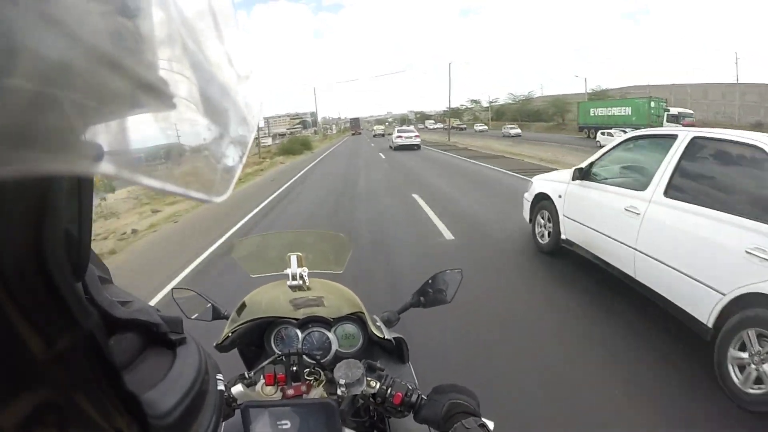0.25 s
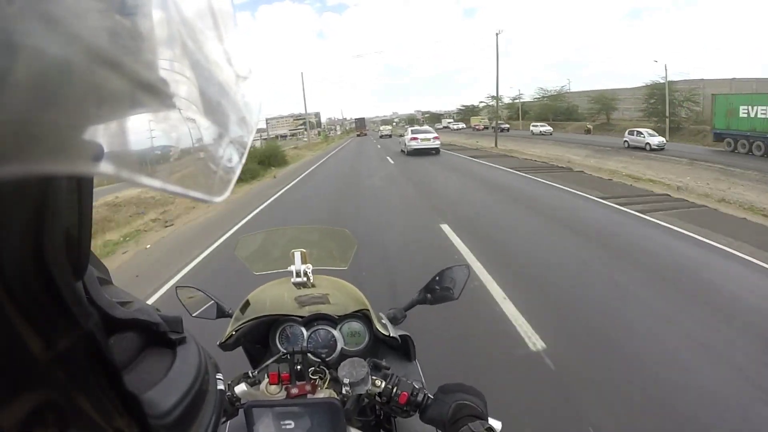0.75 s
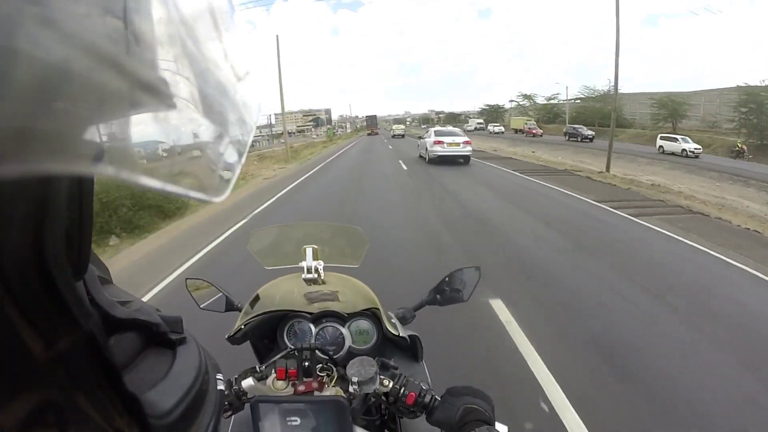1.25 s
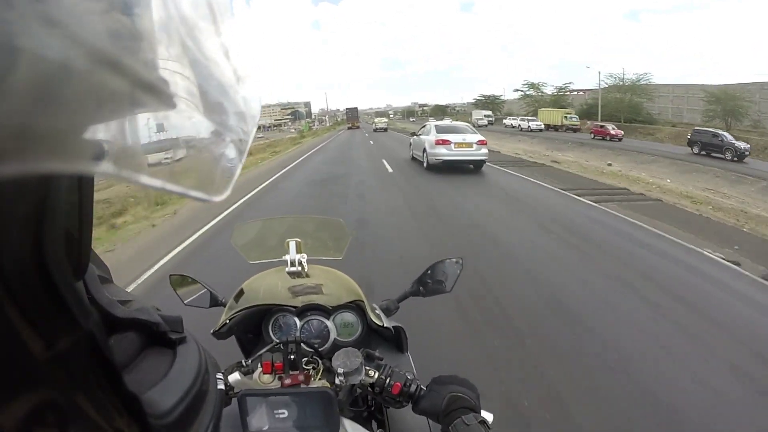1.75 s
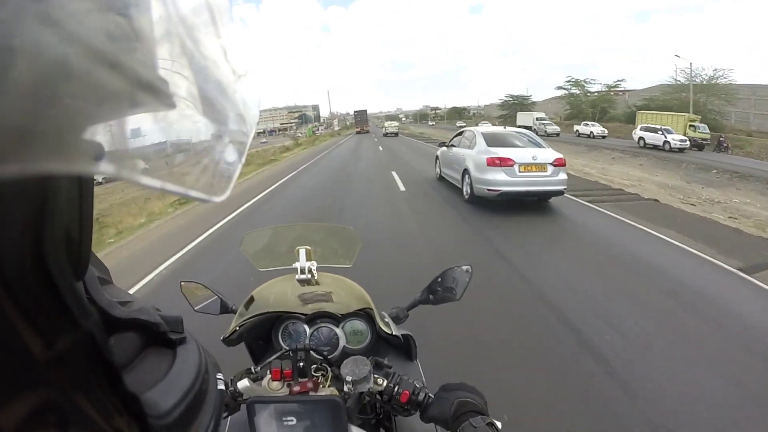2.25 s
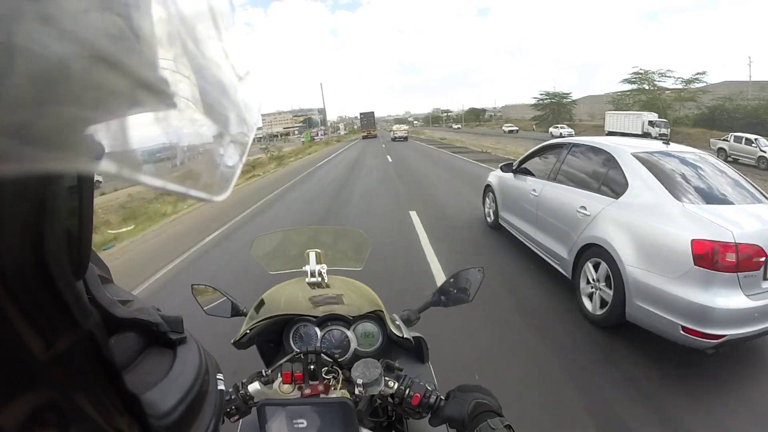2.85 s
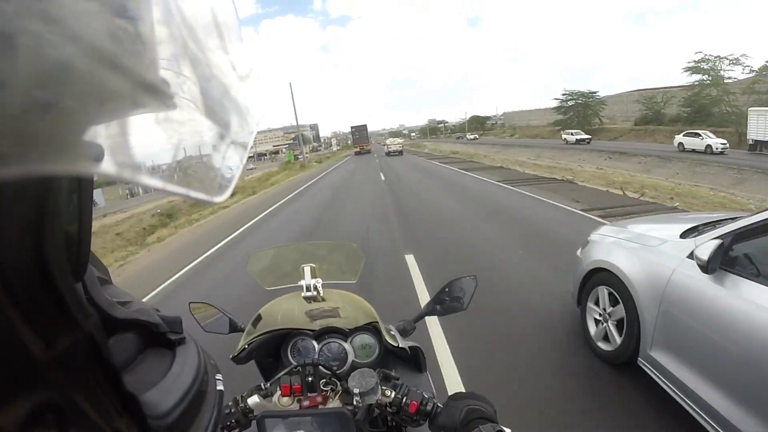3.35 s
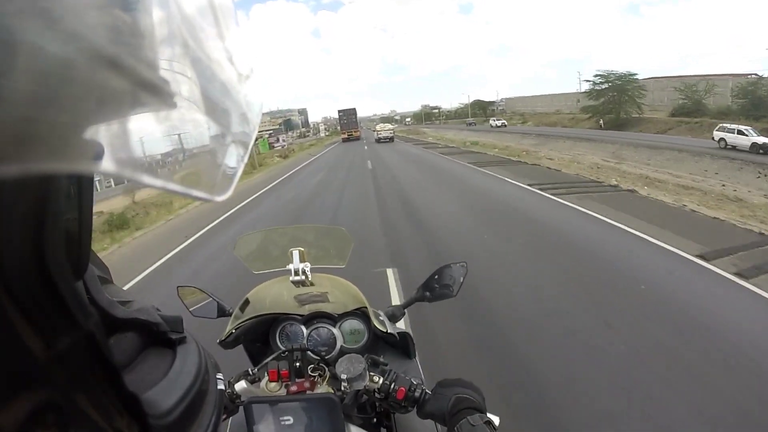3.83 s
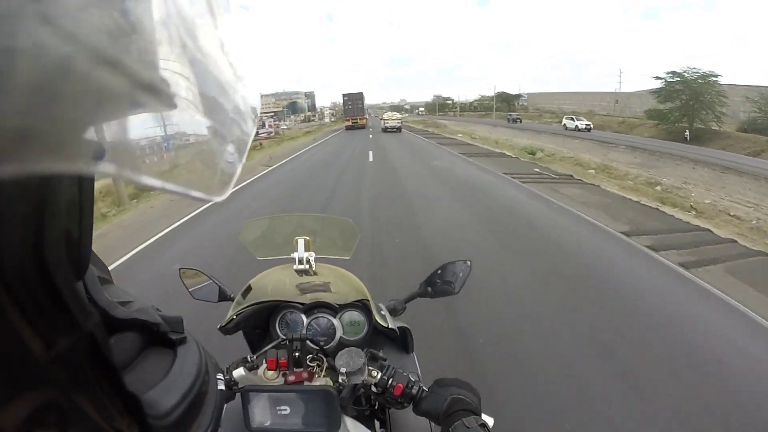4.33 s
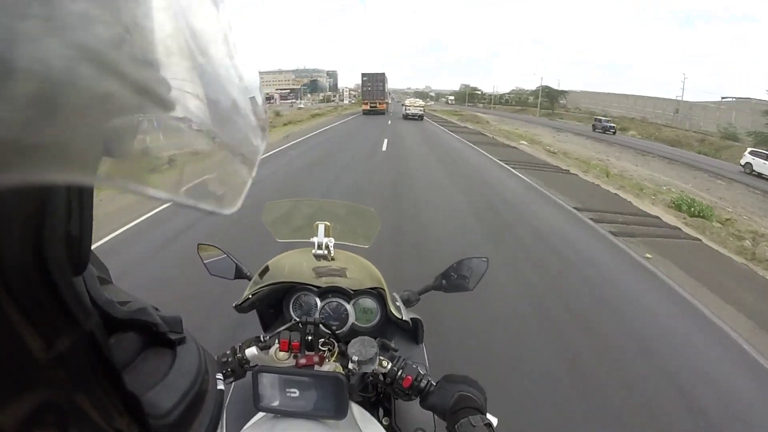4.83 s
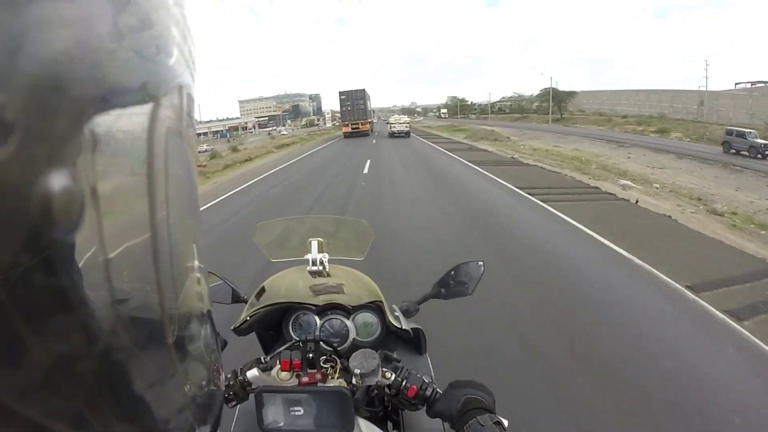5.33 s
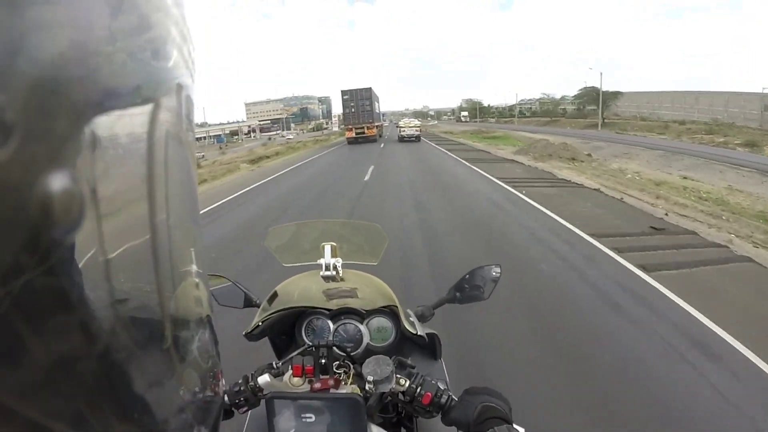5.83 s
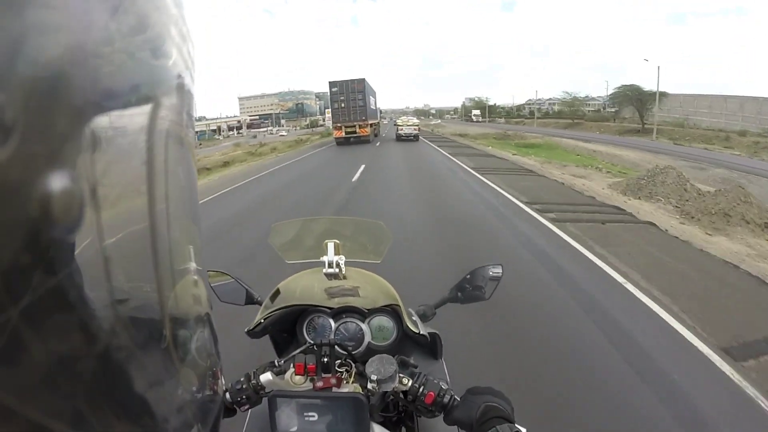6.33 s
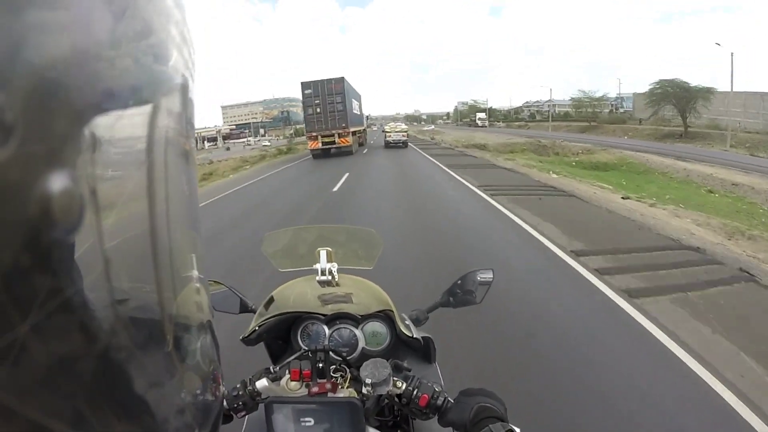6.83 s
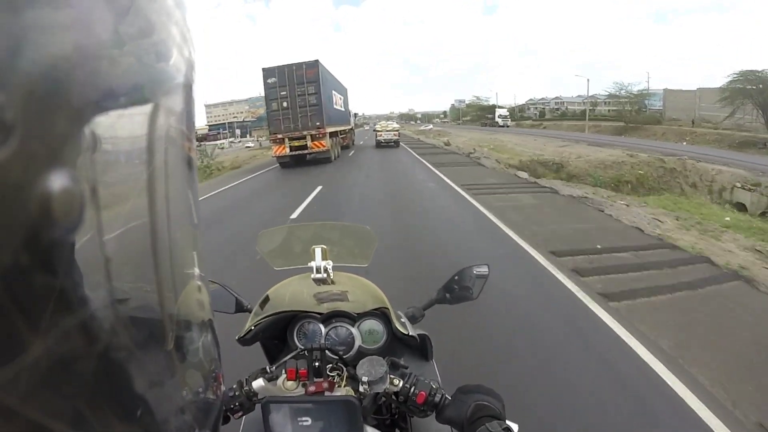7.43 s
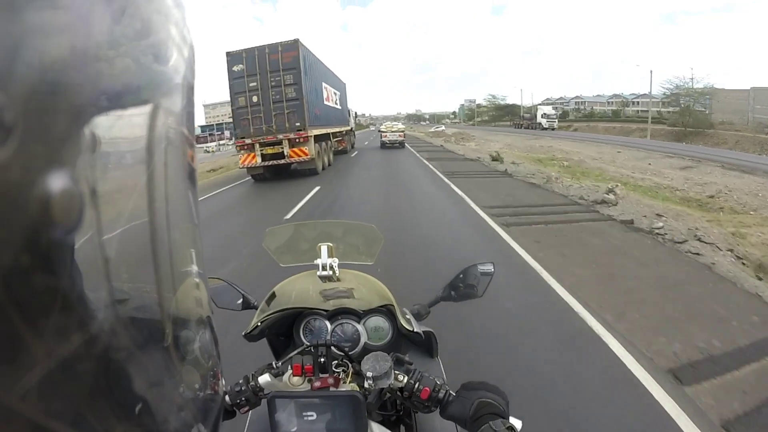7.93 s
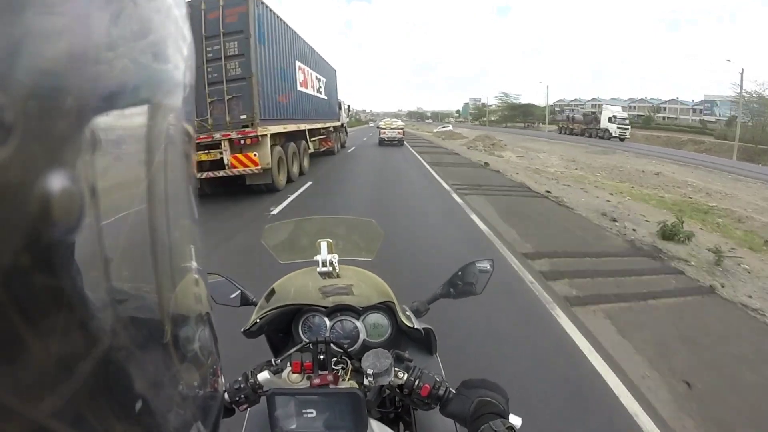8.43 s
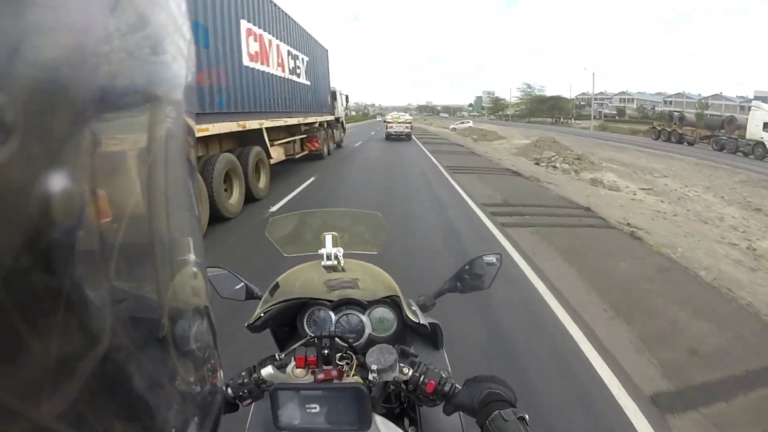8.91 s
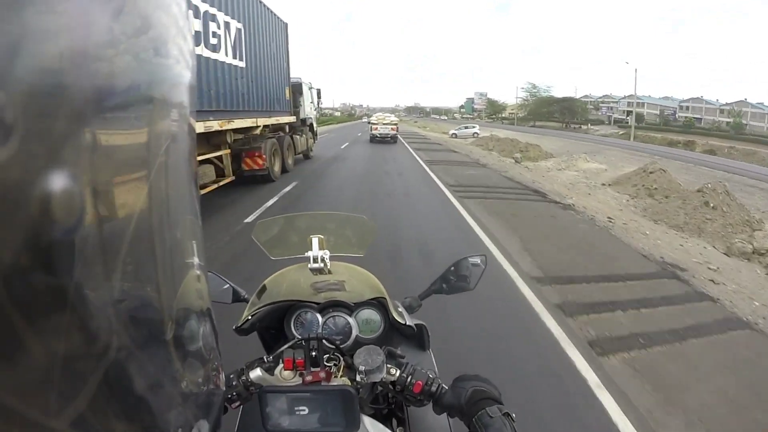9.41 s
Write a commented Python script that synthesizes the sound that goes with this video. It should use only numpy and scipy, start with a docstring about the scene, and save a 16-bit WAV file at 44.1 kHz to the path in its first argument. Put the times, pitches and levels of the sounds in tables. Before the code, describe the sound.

Dense wind noise batters a small cased microphone on a motorcycle helmet at highway speed: low buffeting, a hollow rush and resonant hiss, with irregular thumps and brief lulls. About halfway a visor snaps shut in a rapid cluster of hard plastic knocks; the wind drops suddenly, then gradually climbs back. Towards the end, while passing a lorry, a low engine drone rises out of the slightly easing wind.

```python
"""Wind on a motorcycle helmet at highway speed, heard by a small camera in a case on it.
The air is shaped noise: hiss rung by the case, low buffeting and a rush between, all stirred together.
The rider snaps the visor shut: sine thuds with cracks of noise; the wind's level dips there and climbs back.
An engine drone, a stack of wavering sines, rises out of the wind while a lorry is overtaken.
A faint sine comes and goes early on."""
import sys
import numpy as np
from scipy import signal
from scipy.fft import rfft, irfft, next_fast_len
from scipy.io import wavfile
from scipy.ndimage import uniform_filter1d

SR = 44100
rng = np.random.default_rng(int(sys.argv[2]) if len(sys.argv) > 2 else 0)


def store_pcm(level_fs):
    """Save levels as 16-bit WAV."""
    pcm = np.round(np.clip(level_fs, -1, 1) * 32767).astype(np.int16)
    wavfile.write(sys.argv[1], SR, np.atleast_2d(pcm).T)


N = 426442   # length in samples


def wind():
    """Moving air makes noise; the same eddies shake hiss, buffeting and rush together."""
    # resonances of case and mount, rung by the air: pitch_hz, width_hz, level_db (relative)
    case_modes = [(1182, 94, -14.5), (1433, 74, -21.5), (1700, 83, -11.5), (1845, 58, -14),
                  (2096, 160, -22.5), (2381, 64, -14), (2544, 174, -23), (2970, 71, -24.5),
                  (3276, 138, -20.5), (3750, 130, -20.5), (4172, 133, -14.5), (4475, 300, -18),
                  (4883, 148, -17), (5120, 130, -27), (5890, 440, -35), (7170, 850, -34.5),
                  (7350, 420, -29.5), (7940, 250, -34.5)]
    # the helmet's boom: pitch_hz, width_hz, level_db (relative)
    helmet_modes = [(103.5, 21.2, -0.5)]
    # air pockets under the visor and mount: pitch_hz, width_hz, level_db (relative)
    pocket_modes = [(255.3, 37, 0), (779.3, 17, -5.5)]
    # smooth spectrum of each layer: pitch_hz, level_db (relative, per Hz)
    hiss_spectrum = [(500, -32.5), (1000, -28.5), (2800, -38), (5000, -33), (5500, -36.5), (8300, -56),
                     (10000, -34.5)]
    buffet_spectrum = [(8, -28), (15, -12.5), (30, -6), (60, -6), (90, -3), (130, -15.5), (160, -24),
                       (200, -21), (300, -51)]
    rush_spectrum = [(100, -38.5), (160, -11.5), (200, -8), (300, -10.5), (350, -12), (550, -15),
                     (750, -17.5), (1000, -17.5), (1300, -59)]
    split_hz = 2900   # the hiss flutters partly apart below and above this

    hiss_db, buffet_db, rush_db = wind_levels()
    eddy = drift(54.0)

    below = signal.butter(2, split_hz, fs=SR, output="sos")
    above = signal.butter(2, split_hz, "high", fs=SR, output="sos")
    mids = signal.sosfilt(below, turbulence(eddy, shared_db=1.22, own_db=0.26, rate_hz=24.0))
    treble = signal.sosfilt(above, turbulence(eddy, shared_db=2.0, own_db=-0.6, rate_hz=62.0))
    # when the hiss is low, treble drops more than mids
    mids_gain = from_db(-0.15 * (hiss_db - hiss_db.mean()))
    hiss = coloured(mids_gain * mids + treble, hiss_spectrum, case_modes)

    buffet_noise = turbulence(eddy, shared_db=2.0, own_db=-1.06, rate_hz=14.0)
    buffet = evened(coloured(buffet_noise, buffet_spectrum, helmet_modes), window_s=0.14)

    rush_noise = turbulence(eddy, shared_db=1.0, own_db=0.0, rate_hz=11.0)
    rush = evened(coloured(rush_noise, rush_spectrum, pocket_modes), window_s=0.16)

    return from_db(hiss_db) * hiss + from_db(buffet_db) * buffet + from_db(rush_db) * rush


def wind_levels():
    """Levels of hiss, buffeting and rush in dB: airstream, dip, lulls, surges, thumps and gusts."""
    # airstream on the helmet, easing beside the lorry: time_s, hiss_db, buffeting_db, rush_db
    airstream = [(0, -18.5, -17, -28.5), (1.5, -19.5, -18.5, -29.5), (1.95, -18.5, -20.5, -30),
                 (2.4, -20, -18, -28), (3.0, -19.5, -19, -31), (3.5, -18, -18, -27), (4.3, -21.5, -19, -29),
                 (4.9, -18.5, -19.5, -30.5), (5.5, -18.5, -18, -27.5), (6.6, -18.5, -18.5, -29),
                 (7.3, -16.5, -18.5, -27.5), (7.7, -19, -20.5, -28), (8.3, -20, -22, -29),
                 (8.8, -20.5, -21, -28.5), (9.3, -22.5, -24.5, -30), (9.67, -24, -22.5, -29.5)]
    # lulls of the air: middle_s, half_length_s, hiss_change_db, low_wind_change_db
    lulls = [(0.68,0.057,0.5,-3.5), (1.427,0.023,-5.5,1.5), (1.69,0.015,-2.5,0.5), (1.87,0.039,-2,-4),
             (2.285,0.058,-4.5,2), (2.624,0.053,-5,-2), (3.098,0.024,-6,-2), (3.395,0.0084,-4,0),
             (3.85,.02,-2.5,2.5), (4.305,0.04,-6,-0.5), (4.545,0.014,-7.5,-3.0), (4.61,0.015,-9,-1),
             (5.022,0.0095,-4,0), (5.04,0.0071,-9,0), (5.056,.015,-7,0), (5.085,0.038,-9,3.5),
             (5.17,0.026,-5,-3), (5.65,.025,-2,-2), (5.81,.03,-2,-2.5), (6.031,0.027,-7.5,-3.5),
             (6.081,0.031,-16.5,-5.0), (6.124,0.008,-7,0.5), (6.19,.01,-2.5,0), (6.425,0.024,-13,-1),
             (7.124,0.029,-9,0), (7.568,0.053,-7,-4.5), (7.775,0.015,-4.5,2), (8.13,.06,1,-2),
             (8.191,0.023,-5.5,0), (8.67,0.019,-4.5,0), (9.029,0.042,-11.5,-1.5), (9.109,0.026,-13.5,-4),
             (9.152,0.013,-9,-2), (9.444,0.023,-10,-4)]
    # surges of the hiss: middle_s, half_length_s, hiss_change_db
    surges = [(.47,0.057,2.5), (1.08,.04,1), (1.55,0.068,3), (1.76,.03,2), (2.37,0.026,3.5), (2.849,0.06,4),
              (4.47,0.018,4), (4.854,0.034,5), (4.96,0.049,3), (5.712,0.025,5), (5.907,0.035,6),
              (6.33,.025,2), (6.575,0.055,6.5), (7.852,0.033,5.5), (7.967,0.058,4), (8.71,0.016,6),
              (8.76,0.013,6.5), (9.195,0.041,9.5)]
    # thumps of air on the helmet: middle_s, half_length_s, buffeting_change_db, rush_change_db
    thumps = [(.205,0.057,3.5,-0.5), (.27,.015,2,4.5), (0.793,0.081,5.5,3), (.99,0.025,5,2),
              (1.537,0.069,2.5,6), (1.716,0.048,7.5,4.5), (2.434,0.06,6.5,2), (2.928,0.034,9,9.5),
              (3.048,0.024,9,5.5), (3.65,0.045,2.5,3.5), (4.021,0.016,6,8), (4.605,0.025,8,-1),
              (4.834,0.014,9,10.5), (5.035,0.034,5.5,8), (5.12,0.019,8,1), (5.572,0.023,-1,5),
              (5.707,0.022,6,2), (6.156,0.017,9,-3), (6.57,0.047,4,4.5), (6.824,0.019,7,-2),
              (7.433,0.028,7.5,3), (7.752,0.014,6,7.5), (7.917,0.02,4,6), (8.002,0.018,13.5,2),
              (8.236,.02,6,-1.5), (8.94,0.023,6,1), (9.17,0.024,8,7), (9.264,0.044,7.5,2.5),
              (9.533,0.023,13,3)]
    # the level of all wind dips at the visor knocks and climbs back evenly in dB
    dip_at_s, dip_db, fall_s, recovery_s = 5.08, -10.5, 0.06, 1.28
    # random gusts on top: spread for hiss, buffeting and rush, and how fast they wander
    gust_spreads_db, gust_rate_hz = (0.95, 1.0, 1.3), 7.5

    since_s = np.arange(N) / SR - dip_at_s
    falling = since_s / fall_s
    recovering = 1 - (since_s - fall_s) / recovery_s
    dip = dip_db * np.clip(np.minimum(falling, recovering), 0, 1)

    # after a lull the air comes back in 0.93 of the time it took to fall away
    hiss_lull, low_lull = bumps(lulls, after=0.93)
    (hiss_surge,) = bumps(surges)
    buffet_thump, rush_thump = bumps(thumps)
    events = [hiss_lull + hiss_surge, low_lull + buffet_thump, low_lull + rush_thump]

    gusts = [spread_db * drift(gust_rate_hz) for spread_db in gust_spreads_db]
    return np.array(in_time(airstream)) + dip + events + gusts


def turbulence(eddy, shared_db, own_db, rate_hz):
    """Noise whose level flutters with the shared eddies and by itself."""
    flutter_db = shared_db * eddy + own_db * drift(rate_hz)
    return rng.standard_normal(N) * from_db(flutter_db)


def visor():
    """Each knock pushes the shell inward in a short thud and adds a plastic crack."""
    # visor knocks: start_s, thud_db, thud_hz, crack_db
    knocks = [(4.957, -1, 550, -30), (5.012, -9, 594, -22), (5.0202, 4, 274, -28), (5.030, -28, 700, -7),
              (5.034, 3, 350, -24), (5.035, -2, 500, -26), (5.044, -11, 1800, -13), (5.059, -12, 500, -21),
              (5.0657, -8, 696, -5), (5.071, -4.5, 910, -24), (5.087, -16, 1200, -30),
              (5.091, -4, 910, -30)]
    thud_rise_s, crack_decay_s = 0.00016, 0.0015

    out = np.zeros(N)
    t = np.arange(2000) / SR
    crack_band = signal.butter(2, [2000, 6500], "band", fs=SR, output="sos")
    bursts = signal.sosfilt(crack_band, rng.standard_normal((len(knocks), len(t))))
    for (start_s, thud_db, thud_hz, crack_db), burst in zip(knocks, bursts):
        # higher thuds die away sooner
        thud_shape = (1 - np.exp(-t / thud_rise_s)) * np.exp(-t * thud_hz * 2.9)
        thud = -np.sin(2 * np.pi * thud_hz * t) * thud_shape
        crack = burst * np.exp(-t / crack_decay_s)
        at = round(start_s * SR)
        out[at:at + len(t)] += from_db(thud_db) * thud + from_db(crack_db) * crack
    return out


def engine():
    """Sines at low multiples of the firing rate swell in; each one's level wavers a little."""
    # engine drone: time_s, firing_hz, level_db
    drone = [(7.9, 86.8, -50), (8.1, 88.1, -44), (8.56, 89.55, -37.5), (9.13, 90.9, -39),
             (9.67, 92.3, -37.5)]
    # strength of each overtone: multiple of the firing rate, level_db (relative)
    overtones = [(2, 4.5), (3, -13), (4, 2.5), (5, 1.5), (6, -7)]
    swell_at_s, swell_s = 7.7, 0.18

    firing_hz, level_db = in_time(drone)
    unsteady_hz = firing_hz * (1 + 0.00292 * drift(5.55))
    phase = 2 * np.pi * np.cumsum(unsteady_hz) / SR
    swell = np.clip((np.arange(N) / SR - swell_at_s) / swell_s, 0, 1)

    tone = np.zeros(N)
    for multiple, overtone_db in overtones:
        wavering_gain = from_db(overtone_db + 1.1 * drift(4.1))
        tone += wavering_gain * np.sin(multiple * phase + rng.uniform(0, 2 * np.pi))
    # root 2 makes the levels rms levels
    return np.sqrt(2) * swell * from_db(level_db) * tone


def faint_tone():
    """A faint passing tone: one thin sine that comes, sags slightly in pitch and goes."""
    # path of the tone: time_s, pitch_hz, level_db
    tone_path = [(.9, 466, -98), (1.2, 464, -43), (1.5, 461, -43), (1.9, 460, -47), (2.2, 460, -45)]
    fade_s = 0.2

    pitch_hz, level_db = in_time(tone_path)
    end_s = tone_path[-1][0] + fade_s
    fade = np.clip((end_s - np.arange(N) / SR) / fade_s, 0, 1)
    sine = np.sin(2 * np.pi * np.cumsum(pitch_hz) / SR)
    return np.sqrt(2) * fade * from_db(level_db) * sine


def rounded_and_dulled(x):
    """Soft peak rounding, then a steep low-pass: the sound is dull above 9400 Hz."""
    rounded = 1.2 * np.tanh(x / 1.2)
    return signal.sosfilt(signal.ellip(10, 0.5, 70, 9400, fs=SR, output="sos"), rounded)


def from_db(db):
    """Decibels to gain."""
    return 10 ** (np.asarray(db) / 20)


def rms_one(x):
    """Scale to rms 1, so that a later gain sets the level."""
    return x / np.sqrt(np.mean(x ** 2) + 1e-20)


def in_time(rows):
    """Table columns after the time as curves, one value a sample."""
    time_s, *columns = np.transpose(rows)
    return [np.interp(np.arange(N) / SR, time_s, column) for column in columns]


def drift(rate_hz):
    """Slow random wandering of spread 1: noise sent twice through a one-pole low-pass."""
    step = 40   # samples between the points of the curve
    r = np.exp(-2 * np.pi * rate_hz * step / SR)
    noise = rng.standard_normal(N // step + 2002)
    slow = signal.lfilter([1], [1, -2 * r, r * r], noise)[2000:]   # drop the filter's start
    return np.interp(np.arange(N) / step, np.arange(len(slow)), rms_one(slow))


def coloured(x, spectrum, modes=()):
    """Shape x by a smooth spectrum plus steep-sided resonances, summed in power; rms 1."""
    size = next_fast_len(N)
    hz = np.maximum(np.arange(size // 2 + 1) * SR / size, 1)
    point_hz, point_db = np.transpose(spectrum)
    power = from_db(2 * np.interp(np.log(hz), np.log(point_hz), point_db))
    for mode_hz, width_hz, mode_db in modes:
        power = power + from_db(2 * mode_db) / (1 + ((hz - mode_hz) / width_hz) ** 2) ** 2
    return rms_one(irfft(rfft(x, size) * np.sqrt(power), size)[:N])


def evened(x, window_s):
    """Reduce the slow swell of narrow noise, so that the gusts mostly set the level."""
    nearby_power = uniform_filter1d(x ** 2, round(window_s * SR))
    return rms_one(x / np.sqrt(nearby_power + 0.092))


def bumps(rows, after=1):
    """Each row lifts or lowers the levels along a bell; one dB curve a column."""
    t = np.arange(N) / SR
    out = np.zeros((len(rows[0]) - 2, N))
    for middle_s, half_s, *change_db in rows:
        first = max(round((middle_s - 3 * half_s) * SR), 0)
        near = slice(first, round((middle_s + 3 * half_s) * SR))
        # "after" scales the length of the second half of the bell
        side_s = half_s * np.where(t[near] > middle_s, after, 1)
        bell = np.exp(-((t[near] - middle_s) / side_s) ** 2)
        out[:, near] += np.outer(change_db, bell)
    return out


def scene():
    """Wind, engine and tone are rounded and low-passed; the brighter knocks are added after."""
    steady_layers = wind() + engine() + faint_tone()
    return (rounded_and_dulled(steady_layers) + visor())[None]


def record(dry):
    """Cut the top above 15 kHz steeply."""
    return signal.sosfilt(signal.ellip(10, 0.5, 70, 15000, fs=SR, output="sos"), dry)


dry = scene()
out = record(dry)
store_pcm(out)
```